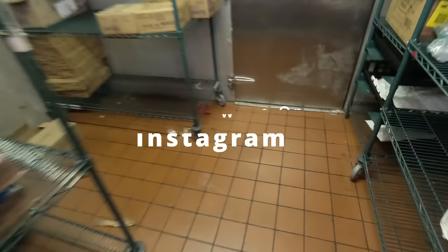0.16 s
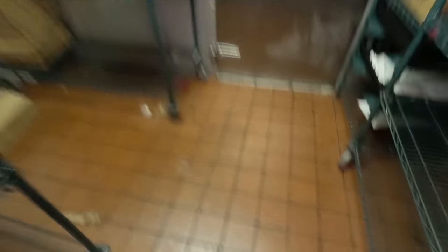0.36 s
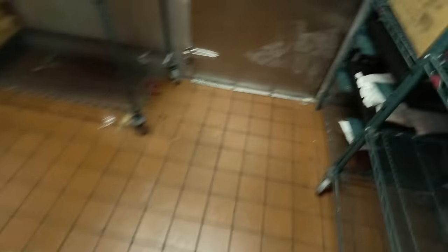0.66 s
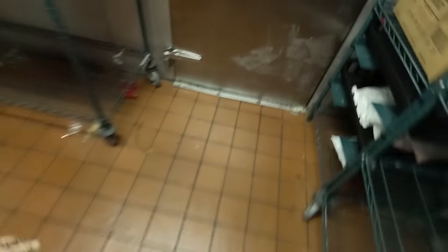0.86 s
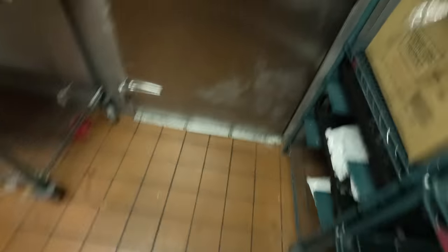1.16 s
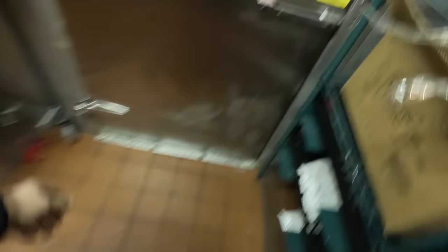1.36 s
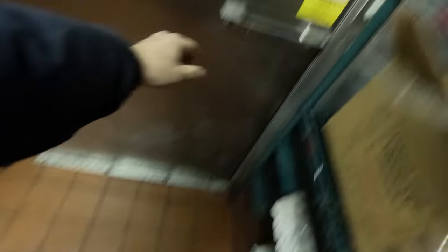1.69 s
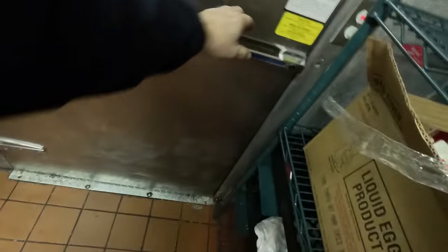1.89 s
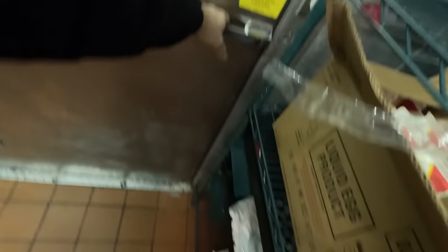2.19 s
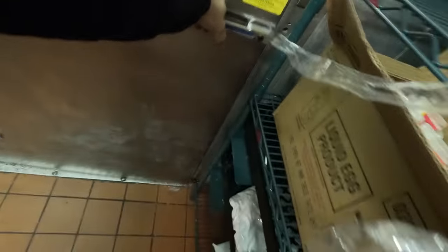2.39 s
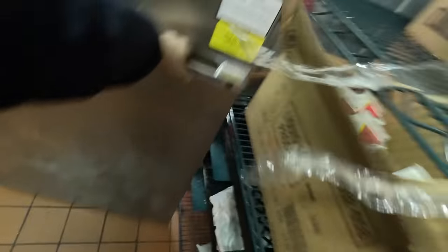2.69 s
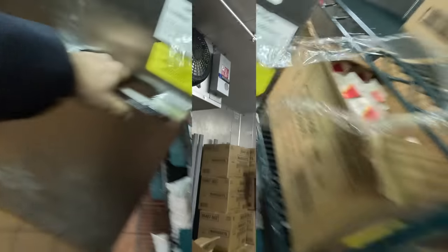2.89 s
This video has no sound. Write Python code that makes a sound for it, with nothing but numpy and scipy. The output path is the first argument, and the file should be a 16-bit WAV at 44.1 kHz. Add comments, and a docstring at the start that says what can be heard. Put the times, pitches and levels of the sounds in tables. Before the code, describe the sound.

Heavy cold-room door unlatched with hard metallic clunks, after squeaky footsteps, over steady fan drone.

```python
"""Walking to a freezer door

Someone walks through a cold store under droning fans, made of wavering sine tones over coloured noise.
Rubber soles thud, scuff and squeak: bands of noise that die away, low swelling cycles, gliding raspy tones.
Small ticks are fading bright noise. The latch clunks, its steel and the door panel ring as fading sines,
and the handle clacks twice as the door swings open; a faint blurred whine then grows.
"""
import sys
import numpy as np
from scipy import signal
from scipy.fft import rfft, irfft, next_fast_len
from scipy.io import wavfile
from scipy.ndimage import uniform_filter1d

SR = 44100
rng = np.random.default_rng(int(sys.argv[2]) if len(sys.argv) > 2 else 0)


def transcribe(u):
    """Save the signal u as a 16-bit wav file named by the first command-line argument.

    u: samples, shape (n,) or (channels, n), limited to [-1, 1]; the rate is SR.
    q: integer samples, one column per channel.
    """
    v = np.clip(np.atleast_2d(u).T, -1, 1)
    q = np.round(v * 32767).astype(np.int16)
    wavfile.write(sys.argv[1], SR, q)


N = 134505  # length in samples

# Fan hum at the listener, swelling and sinking with the room's standing waves: t/s, level/dB
HUM_LEVEL = [(0, -20), (.08, -28), (.17, -15.5), (.36, -13), (.47, -17.5), (.58, -14), (.75, -20.5),
             (.89, -9.5), (1.02, -11.5), (1.1, -18), (1.23, -10.5), (1.35, -16), (1.52, -20.5), (1.72, -27),
             (2.04, -22.5), (2.25, -30), (2.4, -18), (2.65, -22.5), (2.82, -35.5), (3.05, -24)]
HUM_HZ, HUM_WAVER_HZ, HUM_FLUTTER_DB = 242.6, 0.77, 1.4
# A second fan tone that swells and sinks on its own: t/s, level/dB
SECOND_TONE_LEVEL = [(0, -31), (.24, -17), (.35, -39), (.55, -30.5), (.82, -31.5), (1.03, -19), (1.16, -38),
                     (1.7, -38.5), (2.05, -30.5), (2.3, -29.5), (2.5, -32), (3.05, -39)]
SECOND_TONE_HZ, SECOND_TONE_WAVER_RAD = 361, 1.17
# Weaker fan tones: f/Hz, level at the start/dB, fading up and down/dB
WEAK_FAN_TONES = [(120.2, -37.5, 2), (474, -37, -0.5), (609, -39.5, 13.5)]
# Moving air of the fans: t/s, rumble level/dB, rush level/dB, hiss level/dB
AIR_LEVEL = [(0, -21, -28, -38), (.45, -20.5, -25, -38), (.75, -22, -25.5, -37.5),
             (1.12, -21.5, -27.5, -40.5), (1.42, -23.5, -29, -35.5), (1.65, -29.5, -34, -45.5),
             (1.9, -27.5, -32.5, -44.5), (2.3, -25.5, -31, -44.5), (2.55, -22, -28, -40.5),
             (2.79, -18.5, -34.5, -37), (2.91, -31.5, -35, -44), (3.05, -22, -33, -40.5)]
# Colour of the low rumble, the middle rush and the high hiss of air: f/Hz, relative level/dB
RUMBLE_COLOUR = [(25, -69), (60, -40), (98, -20.5), (125, -0.5), (190, 0), (260, 2), (330, 4.5),
                 (420, -5.5), (600, -38), (1000, -55)]
RUSH_COLOUR = [(250, -36.5), (480, 6.5), (640, 3.5), (1000, -3), (1400, -2), (2200, -4), (3200, -8.5),
               (4500, -16.5), (8000, -60.5)]
HISS_COLOUR = [(2000, -3.5), (4000, 0), (5500, -3.5), (7500, -12.5), (9000, -20.5), (10300, -20),
               (11500, -59.5), (15000, -60)]

# Small ticks of hand, handle and loose plastic: t/s, level/dB
TICKS = [(.26, -46), (1.35, -64), (1.695, -42.5), (1.916, -41), (2.3537, -35), (2.5004, -37), (2.5273, -54),
         (2.565, -34)]
TICK_T60_S = 0.17  # time to fade by 60 dB
# A sole brushes the tiles: t/s, level/dB, width/s
BRUSHES = [(.47, -37, 0.046), (.885, -35, 0.034)]
# Colour shared by ticks and brushes: f/Hz, relative level/dB
TICK_COLOUR = [(800, -2.5), (3000, 11.5), (7000, 0), (10000, -13.5), (14000, -35)]

# Rubber soles squeak: t/s, length/s, start f/Hz, end f/Hz, level/dB, bandwidth/share of start f
SQUEAKS = [(1.1945, 0.007, 3440, 3430, -25.5, 0.35), (1.242, 0.0099, 2954, 2720, -16, 0.59),
           (1.254, 0.037, 2285, 2210, -24.5, 0.2), (1.278, .026, 2533, 3110, -26.5, 0.21),
           (1.564, 0.014, 2450, 2460, -28, 0.062), (1.573, 0.029, 2996, 2980, -30, 0.33),
           (1.597, 0.035, 2943, 2980, -36.5, 0.29)]
SQUEAK_ROOM_DB = -11

# The seven pitches at which a blow's colour is given, from sub to top: f/Hz
COLOUR_HZ = [60, 200, 650, 1300, 2800, 5500, 11000]
# Heel and sole on the tiles: t/s, then relative levels of sub/dB, thump/dB, knock/dB, middle/dB,
# clack/dB, click/dB, top/dB, then 60 dB fading time at 1 kHz/s, crack against tail/dB
STEPS = [(1.2, -72, -1.5, -11.5, -20.5, -28, -34, -50, 0.11, 6),
         (1.2436, -60, -14.5, -19.5, -19, -34, -30, -66.5, 0.27, -6),
         (1.272, -52, -5, -26.5, -24, -29.5, -39, -96, 0.17, -8),
         (1.3668, -35, -26, -18.5, -18.5, -17, -22.5, -52, 0.24, -3.5),
         (1.386, -43, -20.5, -25.5, -38, -23, -34, -49, 0.22, -25),
         (1.448, -45, -12, -41, -45, -30, -38.5, -57, 0.13, 3)]
CRACK_S = 0.0038  # the crack falls to about a third in this time
BASS_LINGERS = 0.25  # power by which fading time grows towards the bass
BUILD_CYCLES = 0.8  # a band builds up over about this many of its own cycles

# Dull thuds as the floor takes the walker's weight and the door flexes off its seal:
# t/s, f/Hz, peak level/dB, width/s
THUDS = [(1.233, 270, -4, 0.011), (1.262, 135, -18, 0.019), (1.3, 204, -7, 0.017),
         (1.389, 70, -28.5, 0.015), (2.629, 86, -16.5, 0.018), (2.84, 341, -11, 0.0047),
         (2.857, 104, -26, 0.027)]

# Latch and door blows: the ten columns of STEPS, then
# relative snap/dB, metal ring/dB, panel boom/dB
LATCH_HITS = [(2.5973, -45, -12, -18.5, -28.5, -26.5, -37.5, -57, 0.11, 18, -1, -34, -3.5),
              (2.627, -44, -12, -27, -26, -25.5, -35, -58, 0.33, -20, -23, -49, -20),
              (2.7074, -52, -25.5, -42, -22.5, -27, -35, -58, 0.036, 6.5, -6, -41, -34),
              (2.7114, -55, -39, -13.5, -33, -28, -26, -40, 0.14, -20, 2, -38, -23),
              (2.8189, -52, -27, -31, -17.5, -33, -38, -37, 0.052, 3.5, -24, -37, -42),
              (2.826, -43, -11, -27, -42, -24, -21.5, -48, 0.11, -12, -29, -30, -26),
              (2.852, -50, -38, -19, -45, -39, -43, -57, 0.03, 4, -25, -51, -22)]
# Ringing pitches of the door panel and of the steel latch: f/Hz, relative level/dB, 60 dB fading time/s
PANEL_MODES = [(82.5, -9, 0.1), (143, -22, 0.15), (192, -5.5, 0.16), (212.6, -3.5, 0.38),
               (335.5, -11.5, 0.24), (390, -4.5, 0.073), (510, -6, 0.11), (625, -9, 0.13)]
LATCH_MODES = [(846, 14, 0.039), (1126, 8, 0.044), (1610, -8, 0.072), (1985, -2, 0.062), (2570, 2, 0.011),
               (3580, 7, 0.04), (4500, 2, 0.069), (5500, -15, 0.14)]
PANEL_LAG_S, PANEL_LOW_HZ, PANEL_CONTACT_HZ = 0.00243, 71.4, 895
SNAP_LOW_HZ, SNAP_HIGH_HZ = 1190, 3270

# The freezer's own fan whines through the opening door: f/Hz, level with the gap open/dB
WHINE_TONES = [(1670, -35), (3450, -41)]
WHINE_START_S, WHINE_RISE_S, WHINE_BLUR_HZ = 2.926, 0.15, 70

ROOM_T60_S, ROOM_DB, WALL_HZ = 0.16, -10, 4360
NOTCH_HZ, NOTCH_Q = 8980, 18
LOW_HZ, TOP_HZ, CUTOFF_HZ = 45, 11000, 15700
CEILING = 0.97  # largest size of a flattened peak, before the last filter


def from_db(db):
    """Turn decibels into a plain multiplier."""
    return 10 ** (np.asarray(db) / 20)


def rms_one(x):
    """Scale a sound so its average strength (rms) is 1."""
    return x / np.sqrt(np.mean(x ** 2) + 1e-20)


def clock():
    """Give the time of every sample in seconds."""
    return np.arange(N) / SR


def half_second():
    """Give the sample times of half a second, the longest that one blow lasts."""
    return np.arange(SR // 2) / SR


def fade(t, t60):
    """Die away steadily, by 60 dB every t60 seconds."""
    return np.exp(-np.log(1000) * t / t60)


def bump(s, width):
    """Swell and sink smoothly around time s."""
    return np.exp(-((clock() - s) / width) ** 2 / 2)


def in_time(rows):
    """Draw straight lines between a table's points, one curve per column."""
    s, *columns = np.transpose(rows)
    return [np.interp(clock(), s, column) for column in columns]


def drift(rate):
    """Wander at random with rms 1, smoothed to stay mostly below the rate in Hz."""
    step = 40  # compute one point per 40 samples, then join the points
    r = np.exp(-2 * np.pi * rate * step / SR)
    white = rng.standard_normal(N // step + 2002)
    slow = signal.lfilter([1], [1, -2 * r, r * r], white)[2000:]  # skip the filter's start
    return np.interp(np.arange(N) / step, np.arange(len(slow)), rms_one(slow))


def noise(colour):
    """Make steady noise of rms 1, with each pitch weighted by the colour table."""
    hz, db = np.transpose(colour)
    size = next_fast_len(N, real=True)
    log_pitch = np.log(np.fft.rfftfreq(size, 1 / SR) + 1)
    weights = from_db(np.interp(log_pitch, np.log(hz), db))
    return rms_one(irfft(rfft(rng.standard_normal(size)) * weights, size)[:N])


def add(out, s, sound):
    """Mix a sound in, starting at time s."""
    i = int(s * SR)
    out[i:i + len(sound)] += sound[:N - i]


def fans():
    """Fans sound as fluttering tones, strong and weak, over the rumble, rush and hiss of moving air."""
    rumble_db, rush_db, hiss_db = in_time(AIR_LEVEL)
    (hum_db,) = in_time(HUM_LEVEL)
    (second_db,) = in_time(SECOND_TONE_LEVEL)
    # one wavering turn drives all tones, so their pitches drift together
    turn = 2 * np.pi * np.cumsum(1 + HUM_WAVER_HZ / HUM_HZ * drift(2.3)) / SR
    tones = from_db(hum_db + HUM_FLUTTER_DB * drift(7.2)) * np.sin(HUM_HZ * turn)
    second_phase = SECOND_TONE_HZ * turn + SECOND_TONE_WAVER_RAD * drift(5.1)
    tones += from_db(second_db) * np.sin(second_phase)
    for hz, db, fading_db in WEAK_FAN_TONES:
        level = from_db(db + rumble_db - rumble_db[0])  # follows the rumble
        fading = rms_one(from_db(fading_db * np.tanh(drift(3.4))))
        tones += level * fading * np.sin(hz * turn + 0.75 * drift(5.5))
    rumble = from_db(rumble_db) * noise(RUMBLE_COLOUR)
    rush = from_db(rush_db + 0.5 * drift(8.7)) * noise(RUSH_COLOUR)
    hiss = from_db(hiss_db + 1.5 * drift(13)) * noise(HISS_COLOUR)
    return np.sqrt(2) * tones + rumble + rush + hiss  # root 2 brings a sine's rms to 1


def small_sounds():
    """Ticks start at once and fade, while a brushing sole swells and sinks, all as bright noise."""
    level = np.zeros(N)
    for s, db in TICKS:
        add(level, s, from_db(db) * fade(half_second(), TICK_T60_S))
    for s, db, width in BRUSHES:
        level += from_db(db) * bump(s, width)
    return level * noise(TICK_COLOUR) * from_db(0.83 * drift(150))


def room(x):
    """Metal walls return dense, dull reflections: fading noise with softened treble."""
    t = half_second()
    tail = rng.standard_normal(len(t)) * fade(t, ROOM_T60_S)
    tail *= t > 0.005  # reflections arrive after 5 ms
    tail = signal.sosfilt(signal.butter(1, WALL_HZ, fs=SR, output="sos"), tail)
    return signal.fftconvolve(x, tail / np.sqrt(np.sum(tail ** 2)))[:N]


def squeaks():
    """Rubber sticks and slips: brief, raspy, gliding squeals, echoed by the room."""
    out = np.zeros(N)
    for s, length, start_hz, end_hz, db, width in SQUEAKS:
        progress = np.linspace(0, 1, int(length * SR) + 2)
        smooth = signal.butter(4, width * start_hz / 2, fs=SR, output="sos")
        slips = signal.sosfilt(smooth, rng.standard_normal((2, SR // 8)))
        slips = slips[:, -len(progress):]  # the filter has settled by here
        turn = 2 * np.pi * np.cumsum(start_hz + (end_hz - start_hz) * progress) / SR
        # two random strengths, a quarter turn apart, blur the pitch
        squeal = rms_one(slips[0] * np.sin(turn) + slips[1] * np.cos(turn))
        add(out, s, from_db(db) * signal.windows.tukey(len(progress), 0.2) * squeal)
    return out + from_db(SQUEAK_ROOM_DB) * room(out)


def blows(rows, grain):
    """A blow is a short crack and a gritty tail of noise; bass builds more slowly and lasts longer."""
    out, t = np.zeros(N), half_second()
    edges = 35 * 2 ** np.arange(0, 9, 0.5)  # bands half an octave wide
    white = rng.standard_normal((2, N))
    # uneven loudness in steps of about 2 ms, shared by all bands of a blow
    wobble = np.repeat(rng.standard_normal((len(rows), 300)), SR // 500, axis=1)[:, :len(t)]
    grits = np.exp(grain * wobble - grain ** 2)
    for k, (low, high) in enumerate(zip(edges, edges[1:])):
        hz, level = np.sqrt(low * high), np.zeros(N)
        build = 1 - np.exp(-(t * hz / BUILD_CYCLES) ** 2)
        for row, grit in zip(rows, grits):
            s, colour, (t60, crack_db) = row[0], row[1:8], row[8:10]
            band_t60 = t60 * (1000 / hz) ** BASS_LINGERS
            tail = fade(t, band_t60) * uniform_filter1d(grit, size=int(2 * SR / hz) + 20)
            crack = from_db(crack_db) * np.exp(-t / CRACK_S) * hz / (hz + 1000)  # weaker in the bass
            band_db = np.interp(np.log(hz), np.log(COLOUR_HZ), colour)
            add(level, s, from_db(band_db) * build * (tail + crack))
        band = signal.butter(3, [low, high], "band", fs=SR, output="sos")
        # neighbouring bands use different noise
        out += level * rms_one(signal.sosfilt(band, white[k % 2])) / 2
    return out


def steps():
    """Soles thud and scuff as they strike the tiles."""
    return blows(STEPS, grain=0.32)


def thuds():
    """Floor and door give a few low, uneven cycles that swell and die."""
    out = np.zeros(N)
    for s, hz, db, width in THUDS:
        phase = 2 * np.pi * hz * (clock() - s) + 0.18 * drift(8.9)
        out += from_db(db) * bump(s, width) * np.sin(phase)
    return out


def ring(times, levels_db, modes, vary_db):
    """Each blow sets every ringing pitch going, with a strength of its own."""
    out, t = np.zeros(N), half_second()
    for s, db in zip(times, levels_db):
        for (hz, mode_db, t60), luck in zip(modes, rng.standard_normal(len(modes))):
            strength = from_db(db + mode_db + vary_db * luck)
            add(out, s, strength * fade(t, t60) * np.sin(2 * np.pi * hz * t))
    return out


def door():
    """The latch snaps and rings; a moment later the heavy panel booms."""
    s, *_, snap_db, metal_db, boom_db = np.transpose(LATCH_HITS)
    contacts = np.zeros(N)
    contacts[(s * SR).astype(int)] = from_db(snap_db)  # single-sample clicks
    snap_band = signal.butter(2, [SNAP_LOW_HZ, SNAP_HIGH_HZ], "band", fs=SR, output="sos")
    # make up for what the band takes from a click, then lower by 20 dB
    snaps = signal.sosfilt(snap_band, contacts) * SR / (SNAP_HIGH_HZ - SNAP_LOW_HZ) / 10
    panel = ring(s + PANEL_LAG_S, boom_db, PANEL_MODES, vary_db=1)
    panel_band = signal.butter(1, [PANEL_LOW_HZ, PANEL_CONTACT_HZ], "band", fs=SR, output="sos")
    panel = signal.sosfilt(panel_band, panel)
    knocks = blows(LATCH_HITS, grain=0.25)
    metal = ring(s, metal_db, LATCH_MODES, vary_db=3)
    return snaps + knocks + metal + panel


def freezer_fan():
    """A faint whine, blurred by random changes of strength and phase, grows as the gap opens."""
    gap = np.clip((clock() - WHINE_START_S) / WHINE_RISE_S, 0, 1)
    whine = np.zeros(N)
    for hz, db in WHINE_TONES:
        blur = drift(WHINE_BLUR_HZ) + 1j * drift(WHINE_BLUR_HZ)
        whine += from_db(db) * np.real(blur * np.exp(2j * np.pi * hz * clock()))
    return gap * whine


def scene():
    """Knocks and squeaks sound in the small hard room, over the fans."""
    drone = fans()
    knocks = steps() + door() + small_sounds()
    echoes = from_db(ROOM_DB) * room(knocks)
    return (drone + knocks + echoes + thuds() + squeaks() + freezer_fan())[None]


def record(dry):
    """The microphone loses the extremes and a narrow treble notch; peaks are flattened, the top is cut."""
    x = signal.lfilter(*signal.iirnotch(NOTCH_HZ, NOTCH_Q, fs=SR), dry)
    x = signal.sosfilt(signal.butter(2, LOW_HZ, "high", fs=SR, output="sos"), x)
    x = signal.sosfilt(signal.butter(5, TOP_HZ, fs=SR, output="sos"), x)
    x = x / (1 + (x / CEILING) ** 16) ** (1 / 16)  # bends only near the ceiling
    return signal.sosfilt(signal.cheby2(12, 70, CUTOFF_HZ, fs=SR, output="sos"), x)


dry = scene()
out = record(dry)
transcribe(out)
```